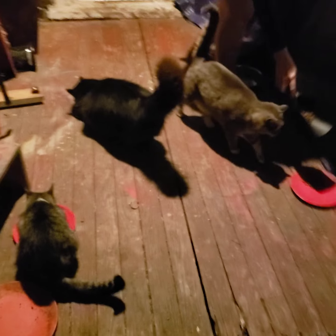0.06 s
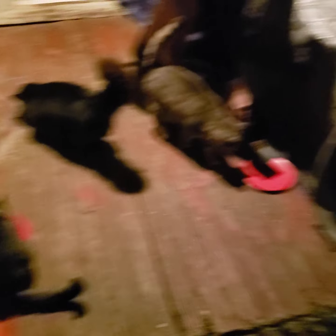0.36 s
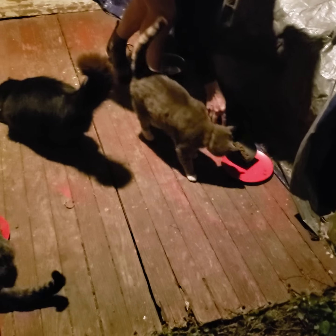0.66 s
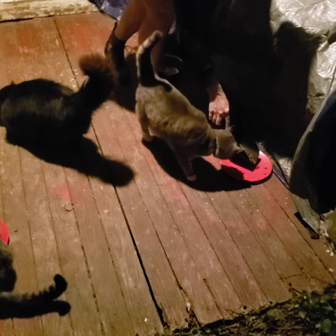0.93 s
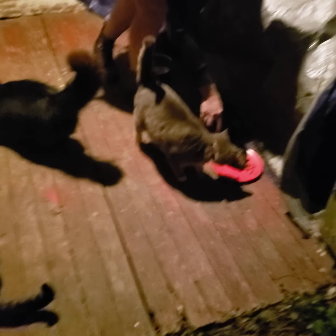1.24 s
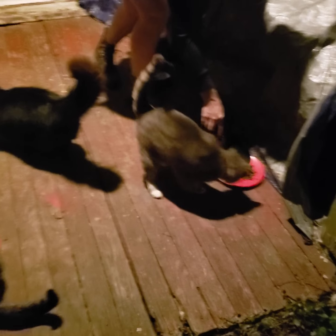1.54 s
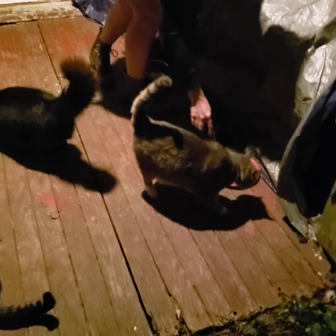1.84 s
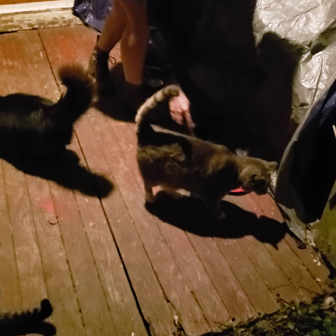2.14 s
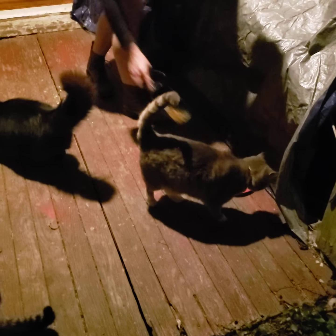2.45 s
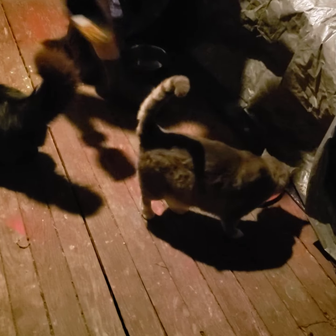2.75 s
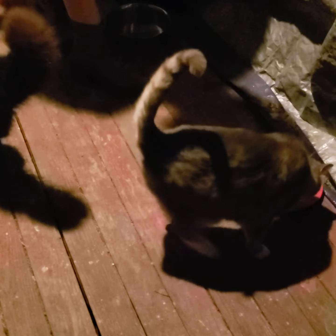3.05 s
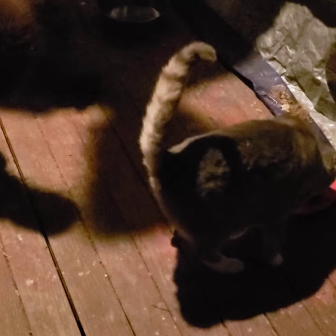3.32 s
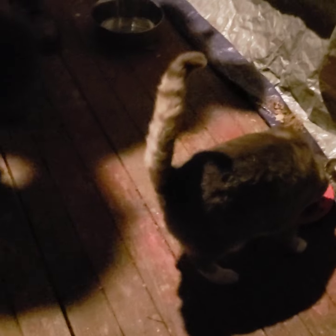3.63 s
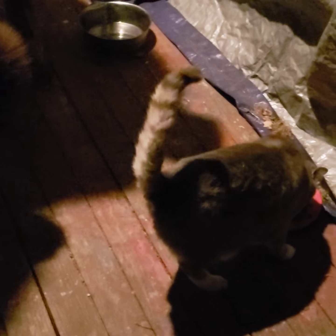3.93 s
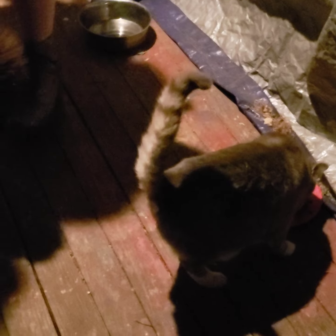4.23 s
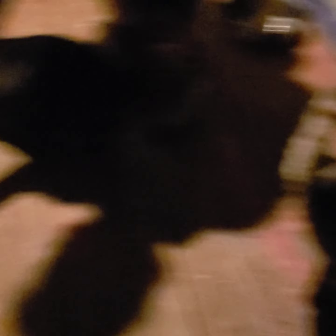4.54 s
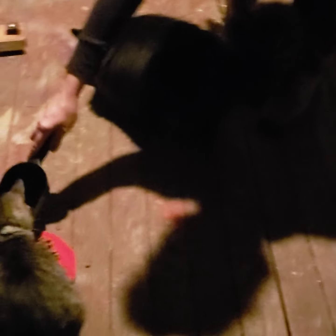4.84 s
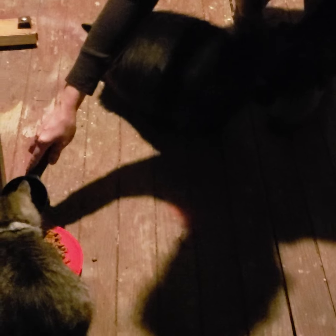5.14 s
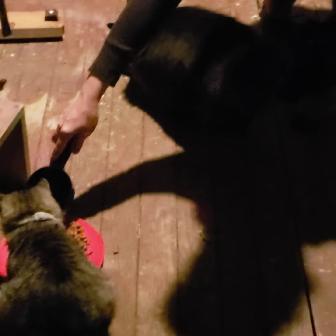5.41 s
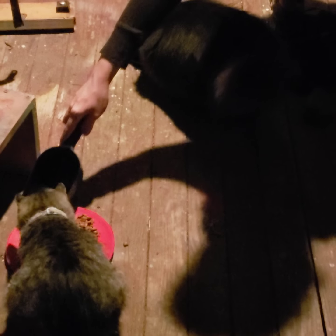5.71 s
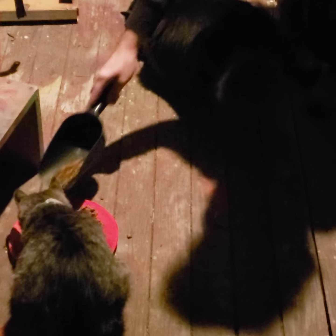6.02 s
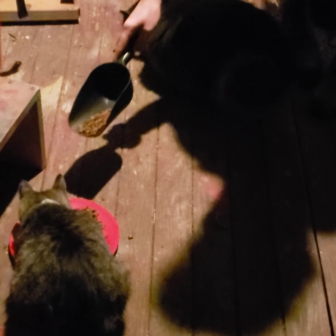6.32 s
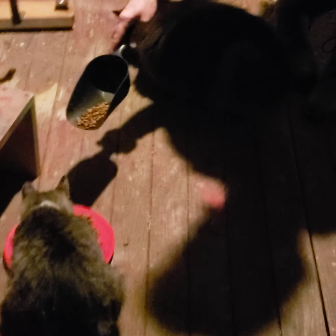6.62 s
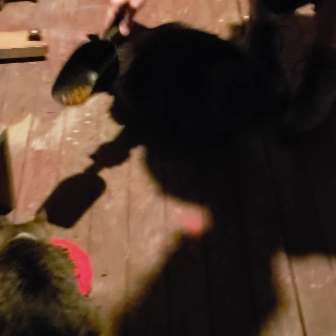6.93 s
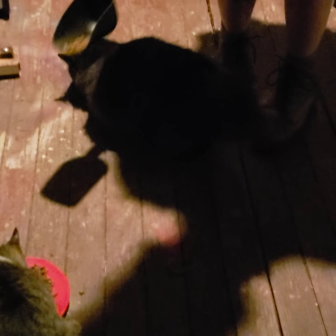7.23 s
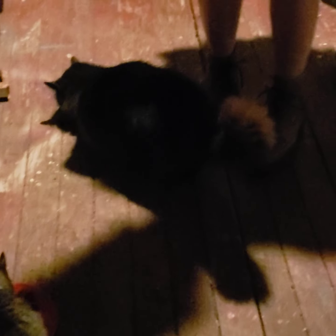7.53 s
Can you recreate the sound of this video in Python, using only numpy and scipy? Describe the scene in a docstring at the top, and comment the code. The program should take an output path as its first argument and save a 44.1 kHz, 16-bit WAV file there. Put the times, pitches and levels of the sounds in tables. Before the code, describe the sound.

On a wooden porch at night, dry cat food ticks and slides from a scoop onto a plastic plate close to the microphone. Down the street a deep, throaty engine revs up, shifts gear, pulls again and coasts away burbling. A second, denser rattle of pellets lands on another plate. Clothes rustle softly and feet scuff the boards over a low, distant town rumble.

```python
"""Dry cat food ticks and slides onto one plastic plate, then another, on a wooden porch at night.
Each pellet contact rings the plate; boards and wall return a short wash. Down the street an
eight-cylinder engine pulls through two gears and coasts: firings boom in the pipe, gas barks, tyres roar.
Clothes rustle close by, with soft scuffs and one squeak, over distant town noise and a faint high ring."""
import sys
import numpy as np
from scipy import signal
from scipy.fft import rfft, irfft
from scipy.io import wavfile
from scipy.ndimage import uniform_filter1d

SR = 44100
rng = np.random.default_rng(int(sys.argv[2]) if len(sys.argv) > 2 else 0)


def int16_out(signal):
    """Quantize to a 16-bit WAV file."""
    q = np.round(np.clip(np.atleast_2d(signal).T, -1, 1) * 32767)
    wavfile.write(sys.argv[1], SR, q.astype(np.int16))


N = 338247
TIME = np.arange(N) / SR

# loudest single pellets: start_s, relative_db, pitch_hz, snap_db
PELLETS = [(0.628, -30, 2960, 2), (0.66, -27.5, 3730, 9), (0.7116, -36, 4840, 0), (0.763, -30, 5670, 5.5),
           (0.9853, -32, 5030, 3), (0.996, -34, 5030, 9), (1.04, -38, 5200, 9), (1.0659, -30.5, 3450, 11),
           (1.0788, -32.5, 5160, 8), (1.1005, -50, 5000, 8), (1.122, -48, 4200, 7), (1.1726, -34, 4970, 2),
           (1.1974, -26, 2640, 3), (1.2172, -30, 2140, 14), (1.2267, -38, 2800, 4),
           (1.2353, -28.5, 5000, 10), (1.2925, -47, 4100, 19), (1.3128, -41, 6760, 11),
           (1.346, -37, 4960, 9), (1.3715, -35.5, 2870, 9), (1.4004, -39, 4360, 11), (1.4578, -40, 4330, 6),
           (1.477, -37, 3300, 3), (1.4964, -40, 4770, 0), (1.6174, -34, 2680, -9.5),
           (1.6454, -39, 4330, -8), (1.664, -32.5, 2970, -6), (1.7476, -37, 5070, 0),
           (1.9552, -38, 2000, -13), (2.039, -40.5, 2440, -12), (4.9705, -39, 2820, 9),
           (5.055, -43, 4200, 9), (5.3066, -36.5, 4050, 0), (5.328, -36.5, 4200, 11),
           (5.3937, -55, 2010, -2), (5.431, -41, 4170, -5), (5.458, -30.5, 4840, 0),
           (5.5768, -52, 4200, -6), (5.5938, -41, 2870, -6), (5.6148, -40, 4240, -4),
           (5.6327, -41, 4150, -2), (5.711, -45, 4240, -8), (5.7407, -35, 4950, -4),
           (5.7637, -32.5, 4900, 4), (5.8083, -51, 2600, -5), (5.8215, -32.5, 5640, 5),
           (5.8472, -38, 3370, 8), (5.8722, -36, 3330, 4)]
# pellets sliding from the scoop: start_s, relative_db, settle_s
SURGES = [(0.659, -52, 0.051), (0.984, -52.5, 0.12), (1.06, -52, 0.11), (1.214, -47, 0.056),
          (1.35, -55.5, 0.4), (1.6, -57, 0.21), (2.134, -65, 0.038), (4.965, -53, 0.026), (5.05, -60, 0.1),
          (5.312, -49, .1), (5.335, -56.5, 0.13), (5.452, -52.5, 0.085), (5.575, -60, .15),
          (5.615, -53, .08), (5.705, -57.5, 0.074), (5.76, -55, 0.055), (5.82, -56.5, 0.059),
          (6.135, -69, 0.08), (6.309, -66, 0.091)]
# dry pellet contact: freq_hz, gain_db
CONTACT_SPECTRUM = [(300, -11.5), (1500, -6.5), (1950, 0.5), (2300, 1.5), (2700, 3), (3400, 2), (5200, 1.5),
                    (6600, -9), (7200, -23), (8700, -26), (11000, -21), (15500, -28)]
# plastic plate modes: pitch_hz, width_hz, gain_db
FIRST_PLATE_MODES = [(1897, 91, 5.5), (2800, 157, 2.5), (3400, 190, -3), (4240, 130, -3), (4980, 290, 1),
                     (5670, 110, 0.5), (6300, 150, 2.5), (7880, 160, 7.5), (9630, 200, 8), (10940, 220, 3),
                     (13200, 250, 1.5), (14400, 140, 11.5)]
SECOND_PLATE_MODES = [(2010, 96, 1.5), (2600, 110, 2.1), (3355, 110, 1.3), (4150, 260, 4.8),
                      (4920, 120, 5.9), (5670, 130, 3.8), (6560, 170, 2), (7340, 150, 6), (11770, 360, 4.3),
                      (12800, 600, 4.5), (14500, 400, 4.1)]
SECOND_PLATE_S, SURGE_ATTACK_S = 4, 0.008
SNAP_HZ, SURGE_SNAP_DB = 7540, 9

# four-stroke engine speed: time_s, cycle_hz
ENGINE_SPEED = [(0.0, 12.04), (0.35, 12.64), (0.8, 14.74), (1.25, 16.96), (1.6, 18.88), (1.9, 20.67),
                (2.0, 20.28), (2.26, 18.0), (2.45, 15.59), (2.6, 15.18), (2.95, 15.78), (3.5, 17.67),
                (4.02, 19.76), (4.46, 21.01), (5.19, 19.8), (5.9, 18.7), (6.34, 18.3), (6.79, 18.4),
                (7.2, 17.1), (7.67, 15.7)]
# throttle pulls, gains at full effort: start_s, build_s, lift_s, boom_db, overtones_db
PULLS = [(0.602, 4, 1.83, 8.5, 15), (2.322, 1.9, 4.51, 6.5, 13.5), (6.103, 0.99, 6.8, 6, 0.5)]
# engine voices by name: nearest_coasting_db, loss_per_doubling_db, effort_exponent, release_s
VOICES = {"boom": (-35, 3.5, 0.35, 0.5), "overtones": (-52, 2.5, 0.5, 0.51)}
# lumpy firing pattern, in multiples of the cycle rate: order, gain_db
FIRING_LINES = [(3, -10), (4, -5.5), (5, 1.5), (6, -8), (7, -3), (8, -19), (9, -5), (10, -8), (11, -4),
                (12, -4), (13, -13), (14, -1.5), (15, -8), (16, 0), (17, -7)]
# brief swells of single lines: order, middle_s, half_length_s, gain_db
LINE_SWELLS = [(7, 0.22, 0.14, 9.5), (7, 1.74, 0.3, 9.5), (4, 1.65, 0.63, 6), (7, 3.55, 0.11, 8),
               (4, 4.05, 0.12, 8.5), (5, 6.56, 0.41, 6)]
# brief swells and dips of the boom: middle_s, half_length_s, gain_db
BOOM_WAVERS = [(0.658, .1, -1.5), (1.226, 0.027, 3), (1.817, 0.11, 3.5), (2.122, 0.21, -5.5),
               (3.08, 0.079, -3.5), (3.847, 0.064, 4), (4.075, 0.046, 2.5), (4.263, 0.064, -2),
               (4.447, 0.063, 4.5), (4.64, 0.089, -4), (5.99, 0.023, -4.5), (6.707, 0.091, 5),
               (7.201, 0.13, -9)]
# exhaust pipe responses: freq_hz, gain_db
BOOM_SPECTRUM = [(20, -62), (40, -14.5), (55, -1), (75, 5), (92, 6), (110, 5), (142, -3), (165, -18),
                 (230, -65), (3000, -110)]
OVERTONE_SPECTRUM = [(110, -50), (145, -15), (165, 11.5), (183, 4.5), (198, 8), (215, 1), (238, 6.5),
                     (256, 4.5), (278, -11), (350, -20.5), (600, -55.5), (3000, -100)]
# exhaust gas rasp: freq_hz, gain_db
LOW_RASP_SPECTRUM = [(350, -11), (560, -11.5), (670, -3), (790, 3.5), (900, -3), (1060, -5.5), (1250, -18),
                     (1600, -12.5), (2500, -57)]
HIGH_RASP_SPECTRUM = [(700, -14), (1200, -8), (1550, -2), (1850, 7.5), (2300, -3.5), (3000, -12),
                      (6000, -48)]
# rasp envelope: time_s, low_db, ring_and_high_db
RASP_LEVELS = [(0, -63, -70.5), (1, -55.5, -68.5), (1.4, -56.5, -64), (1.619, -51, -53), (1.85, -49, -51),
               (2.0, -54.5, -61), (2.29, -61.5, -61), (2.351, -52, -58), (2.65, -56, -60.5),
               (2.87, -62.5, -64.5), (3.349, -59.5, -66), (3.849, -54, -65), (4.151, -51.5, -59.5),
               (4.5, -52.5, -65), (4.719, -59.5, -67.5), (6.101, -64.5, -78.5), (6.6, -61, -79.5),
               (7.3, -78.5, -82.5)]
# tyres on the road: freq_hz, gain_db
TYRE_SPECTRUM = [(150, -15.5), (300, 3.5), (400, -4.5), (520, 1), (640, -3.5), (790, -4.5), (1000, -13),
                 (1250, -13), (2500, -58)]
NEAREST_S, NEAREST_M, SPEED_M_S = 2.7, 26, 10.1
THROTTLE_OPEN_S, THROTTLE_SHUT_S = 0.21, 0.089
BURBLE_PULLING, BURBLE_COASTING = 0.035, 0.75  # share of uneven burning
EVEN_BELOW_HZ, BURBLING_ABOVE_HZ = 14, 16
BARK_LEAD_CYCLES, WEAK_BARK_DB, BARK_SCATTER_DB = .13, -2.5, 1.6
PUFF_RISE_S, PUFF_DECAY_S, PUFF_FLOOR = .007, .01, .24
KNOCK_DB, HISS_DB = -4, -12  # relative to puff, to ring
RING_HZ, RING_REF_CYCLE_HZ, RING_EXPONENT, RING_WIDTH_HZ = 1336, 24.7, 0.15, 196

# moving clothes: middle_s, half_length_s, level_db, scrape_share
SWISHES = [(.02, 0.55, -68, 0.15), (0.495, 0.2, -60, 0.05), (0.874, 0.15, -61.5, 0),
           (1.55, 0.52, -57, 0.08), (2.975, 0.038, -66, 0.2), (3.154, 0.41, -66, 0.3),
           (3.548, 0.19, -60, 0.7), (3.827, 0.27, -65.5, 0.6), (4.522, 0.39, -61.5, 0.3),
           (7.122, .22, -69, 0.9), (7.404, 0.16, -65.5, 0.83)]
# soft and scraping fabric: freq_hz, gain_db
CLOTH_SPECTRUM = [(900, -1), (1900, 8), (3200, 1), (4300, 2.5), (5200, -3.5), (6200, -15), (7500, -26.5),
                  (12000, -33)]
SCRAPE_SPECTRUM = [(1500, -23.5), (2300, -10), (2680, 6), (2900, 1.5), (3400, 2.5), (3700, -1.5),
                   (4020, 0.5), (4300, -7), (5100, -12), (7000, -31.5), (12000, -39)]
# feet and scoop on the porch: start_s, level_db, centre_hz, decay_s
SCUFFS = [(2.171, -47, 1440, 0.029), (2.95, -52.5, 1445, 0.066), (3.55, -53.5, 1480, 0.24),
          (3.70, -55.5, 1900, 0.038), (6.31, -58, 900, 0.13)]
# night air and hiss: freq_hz, gain_db
AIR_SPECTRUM = [(25, 5.5), (60, 9.5), (200, 5.5), (400, 3), (800, -12.5), (1300, -31), (2200, -33),
                (4000, -52), (6000, -55), (8200, -52.5), (11500, -37), (15500, -35)]


def kibble():
    """Sparse pour on the first plate, dense rattle on the second, with single pellets standing out."""
    hits = np.zeros((2, N))
    for start_s, db, pitch_hz, snap_db in PELLETS:
        add(hits, start_s, undb(db - 13.5) * snap(tick(pitch_hz), snap_db))
    hits *= pan(3.9)
    sparse = stream(rate_hz=330, spread_db=2.5)
    dense = stream(rate_hz=1000, spread_db=1.5)
    second = TIME > SECOND_PLATE_S
    pours = (sparse, FIRST_PLATE_MODES, ~second), (dense, SECOND_PLATE_MODES, second)
    out = 0
    for grains, modes, pouring in pours:
        contacts = (hits + grains * undb(2.5) * pan(4.1)) * pouring
        out += plate(contacts, modes)
    return out * undb(-1.53)


def tick(pitch_hz, decay_s=.0018, grit=3.2):
    """One contact: the pellet's short ring plus the crunch of its rough crust."""
    t = np.arange(512) / SR
    crunch = (rng.standard_normal(len(t)) + rng.standard_normal((2, len(t)))) / np.sqrt(2)
    return (np.sin(2 * np.pi * pitch_hz * t) + grit * crunch) * np.exp(-t / decay_s)


def snap(contacts, db):
    """Treble shelf: harder contacts are brighter."""
    return colour(contacts, [(SNAP_HZ * 0.7, 0), (SNAP_HZ, db)], size=512)


def stream(rate_hz, spread_db):
    """Many small, unequal contacts; louder and brighter with stronger flow."""
    timing, size = rng.random((N, 2)).T
    contacts = (timing < rate_hz / SR) * undb(-spread_db * np.log(np.maximum(size, .02)))
    t = np.arange(256) / SR
    crunch = signal.oaconvolve(contacts, np.exp(-t / 0.0027))[:N]
    strength = flow()
    dull = steady(crunch, 0.027) * stereo_noise(0.12, 0) * strength
    hardness = (strength / strength.max()) ** 2
    return dull + hardness * (snap(dull, SURGE_SNAP_DB) - dull)


def flow():
    """Stream strength: each surge starts fast and dies as the pellets settle."""
    power, t = np.zeros(N), np.arange(SR) / SR
    for start_s, db, settle_s in SURGES:
        shape = np.minimum(t / SURGE_ATTACK_S, np.exp((SURGE_ATTACK_S - t) / settle_s))
        add(power, start_s, (undb(db) * shape) ** 2)
    return np.sqrt(power)


def plate(contacts, modes, ring_db=0.5, porch_db=-3.5, porch_t60_s=0.16):
    """Contacts ring the plate; boards and wall return a short wash."""
    t = np.arange(SR // 3) / SR
    ring = 0
    for pitch_hz, width_hz, db in modes:
        phase = 2 * np.pi * rng.random((2, 1))
        envelope = undb(db) * width_hz * np.exp(-np.pi * width_hz * t)
        ring += envelope * np.sin(2 * np.pi * pitch_hz * t + phase)
    wash = rng.standard_normal((2, len(t))) * undb(-60 * t / porch_t60_s) * (1 - np.exp(-t / 0.0027))
    body = (undb(ring_db) * unit(ring) + undb(porch_db) * unit(wash)) / np.sqrt(len(t))
    body[:, 0] += 1  # direct sound
    return signal.oaconvolve(contacts, colour(body, CONTACT_SPECTRUM), axes=1)[:, :N]


def exhaust(cycle_hz, cycles):
    """Even firing gives gliding lines; off throttle, uneven firing burbles in the same pipe."""
    overrun = (1 - throttle()) * np.interp(cycle_hz, [EVEN_BELOW_HZ, BURBLING_ABOVE_HZ], [.15, 1])
    burble = np.clip(BURBLE_PULLING + (BURBLE_COASTING - BURBLE_PULLING) * overrun, 0, 1)
    boom_db = voice_db("boom") + sum(db * swell(s, half_s) for s, half_s, db in BOOM_WAVERS)
    boom, overtones = even_firing(cycle_hz, cycles)
    thumps = uneven_firing(cycles)
    # only a hard pull lifts clear overtones out of the burble
    blur = np.clip(undb(-pull_db("overtones")) ** 2, burble, 1)
    out = 0
    for lines, pipe, db, rough_share in ((boom, BOOM_SPECTRUM, boom_db, burble),
                                         (overtones, OVERTONE_SPECTRUM, voice_db("overtones"), blur)):
        even = np.sqrt(1 - rough_share) * steady(lines, 0.36)
        rough = np.sqrt(rough_share) * steady(colour(thumps, pipe), 1.0)
        out += undb(db) * steady(even + rough, 0.15)
    street_scatter = undb(boom_db - 16.5) * unit(colour(rng.standard_normal((2, N)), BOOM_SPECTRUM))
    return out * pan(-0.81) + street_scatter


def even_firing(cycle_hz, cycles):
    """Harmonics of the cycle rate through the pipe's two responses."""
    boom, overtones = np.zeros((2, N))
    shaft_cycles = cycles + 0.003 * wander(14)
    for order, db in FIRING_LINES:
        swell_db = sum(peak_db * swell(s, half_s) for k, s, half_s, peak_db in LINE_SWELLS if k == order)
        gain = undb(db + swell_db + 2 * wander(6.5))
        line = gain * np.sin(2 * np.pi * (order * shaft_cycles + rng.random()))
        boom += line * response(BOOM_SPECTRUM, order * cycle_hz)
        overtones += line * response(OVERTONE_SPECTRUM, order * cycle_hz)
    return boom, overtones


def uneven_firing(cycles, cylinders=8, jitter_s=.0012):
    """One impulse per firing, scattered in time and strength."""
    firings = np.flatnonzero(np.diff(np.floor(cylinders * cycles)))
    jitter, strength = rng.standard_normal((2048, 2))[:len(firings)].T
    firings += (jitter_s * SR * jitter).astype(int)
    thumps = np.zeros(N)
    thumps[np.clip(firings, 0, N - 1)] = strength
    return thumps


def rasp(cycle_hz, cycles):
    """Gas barks twice a cycle, strong then weak; each bark rings the tailpipe and trails a noise puff."""
    barks = 2 * (cycles + BARK_LEAD_CYCLES)
    index = barks.astype(int)
    age_s = (barks % 1) / (2 * cycle_hz)
    strength = undb(BARK_SCATTER_DB * rng.standard_normal(1024)[index] + WEAK_BARK_DB * (index % 2))
    puffs = strength * np.exp(-age_s / PUFF_DECAY_S) * (0.041 + throttle())
    puffs = steady(PUFF_FLOOR + uniform_filter1d(puffs, int(PUFF_RISE_S * SR)), 0.21)
    knocks = undb(KNOCK_DB) * unit(strength * np.diff(index, prepend=0)) * pan(-3)
    low = unit(colour(stereo_noise(0.3, -2.0) * puffs, LOW_RASP_SPECTRUM))
    doppler = 1 - np.gradient(distance_m()) * SR / 343
    ring_hz = RING_HZ * (cycle_hz / RING_REF_CYCLE_HZ) ** RING_EXPONENT * doppler
    ring = unit(resonance(knocks + stereo_noise(0.4, -4) * puffs, ring_hz, RING_WIDTH_HZ))
    hiss = undb(HISS_DB) * unit(colour(stereo_noise(0.2, -6.5) * puffs, HIGH_RASP_SPECTRUM))
    s, low_db, high_db = np.transpose(RASP_LEVELS)
    return low * undb(np.interp(TIME, s, low_db)) + (ring + hiss) * undb(np.interp(TIME, s, high_db))


def throttle():
    """Opening: 0 coasting, 1 pulling."""
    return sum(ramp(start_s, THROTTLE_OPEN_S) * (1 - ramp(lift_s, THROTTLE_SHUT_S))
               for start_s, _, lift_s, *_ in PULLS)


def voice_db(voice):
    """Engine voice level: up with effort, down with distance."""
    coasting_db, loss_db, *_ = VOICES[voice]
    return coasting_db - loss_db * np.log2(distance_m() / NEAREST_M) + pull_db(voice)


def pull_db(voice):
    """Gain from effort: builds in each pull, falls after lift-off."""
    _, _, exponent, release_s = VOICES[voice]
    db = 0
    for start_s, build_s, lift_s, boom_db, overtones_db in PULLS:
        effort = ramp(start_s, build_s) ** exponent * (1 - ramp(lift_s, release_s))
        db += effort * (boom_db if voice == "boom" else overtones_db)
    return db


def distance_m():
    """Vehicle to listener, along a straight street."""
    return np.hypot(NEAREST_M, SPEED_M_S * (TIME - NEAREST_S))


def tyres(nearest_db=-53.5, loss_per_doubling_db=6):
    """Even road roar, fading with distance."""
    db = nearest_db - loss_per_doubling_db * np.log2(distance_m() / NEAREST_M)
    return unit(colour(stereo_noise(0.46, -4.5), TYRE_SPECTRUM)) * undb(db)


def clothes(rest_db=-77.5):
    """Fabric slides over fabric in soft swishes; some scrape."""
    soft_power, scrape_power = undb(rest_db) ** 2, 0
    for middle_s, half_s, db, scrape_share in SWISHES:
        power = (undb(db) * swell(middle_s, half_s)) ** 2
        soft_power += (1 - scrape_share) * power
        scrape_power += scrape_share * power
    soft = unit(colour(stereo_noise(0.22, 8.2), CLOTH_SPECTRUM)) * np.sqrt(soft_power)
    scrape = unit(colour(stereo_noise(0.22, 8.2), SCRAPE_SPECTRUM)) * np.sqrt(scrape_power)
    return (soft + scrape) * undb(1.3 * wander(70))


def scuffs():
    """Feet and scoop on the boards: dull, short noise bursts."""
    out, t = np.zeros((2, N)), np.arange(SR // 2) / SR
    for start_s, db, hz, decay_s in SCUFFS:
        spectrum = [(hz / 4, -14), (hz / 2.1, -2), (hz, 0), (hz * 2, -14), (hz * 4, -36), (hz * 6, -55)]
        scuff = unit(colour(rng.standard_normal((2, len(t))), spectrum))
        add(out, start_s, undb(db) * scuff * np.exp(-t / decay_s))
    return out


def squeak(pitch_hz=3050, width_hz=300, level_db=-74):
    """A short, gritty rub in one resonance."""
    rub = stereo_noise(0.3, 3) * undb(3 * wander(120))
    return unit(resonance(rub, pitch_hz, width_hz)) * undb(level_db) * swell(middle_s=2.64, half_s=0.071)


def night_ring(pitch_hz=4100, width_hz=150, level_db=-90):
    """Thin, steady high band, perhaps far insects."""
    return unit(resonance(stereo_noise(0.24, 1.5), pitch_hz, width_hz)) * undb(level_db)


def air(level_db=-53):
    """Distant town rumble under a faint hiss."""
    return unit(colour(stereo_noise(0.9, -0.59), AIR_SPECTRUM)) * undb(level_db + 0.64 * wander(6))


def undb(db):
    """Decibels to gain."""
    return 10 ** (np.asarray(db) / 20)


def unit(x):
    """Scale to rms 1."""
    return x / np.sqrt(np.mean(x ** 2))


def steady(x, window_s):
    """Hold running rms at 1; quick flutter stays."""
    power = uniform_filter1d(x ** 2, int(window_s * SR))
    return x / np.sqrt(np.maximum(power, 0) + 1e-12)


def response(spectrum, hz):
    """Gain of a spectrum at hz."""
    freq_hz, db = np.transpose(spectrum)
    return undb(np.interp(np.log(np.maximum(hz, 1)), np.log(freq_hz), db))


def colour(x, spectrum, size=8192):
    """Minimum-phase filter, built from the cepstrum."""
    cepstrum = irfft(np.log(response(spectrum, np.arange(size // 2 + 1) * SR / size)))
    cepstrum[1:size // 2] *= 2
    cepstrum[size // 2 + 1:] = 0
    taps = irfft(np.exp(rfft(cepstrum)))
    return signal.oaconvolve(x, taps if x.ndim == 1 else taps[None], axes=-1)[..., :x.shape[-1]]


def resonance(x, centre_hz, width_hz):
    """Narrow band-pass; the centre may glide."""
    carrier = np.exp(2j * np.pi * np.cumsum(np.broadcast_to(centre_hz, N)) / SR)
    lowpass = signal.butter(2, width_hz / 2, fs=SR, output="sos")
    return np.real(signal.sosfilt(lowpass, x / carrier) * carrier)


def ramp(start_s, length_s):
    """Linear 0 to 1, then hold."""
    return np.clip((TIME - start_s) / length_s, 0, 1)


def swell(middle_s, half_s):
    """Bell in time, peak 1."""
    return np.exp(-np.minimum(((TIME - middle_s) / half_s) ** 2, 20))


def wander(rate_hz):
    """Random drift, spread near 1."""
    knots = rng.standard_normal(2048)
    return np.interp(TIME * rate_hz, np.arange(len(knots)), knots) * np.sqrt(3 / 2)


def stereo_noise(correlation, left_db):
    """Panned white noise, partly alike in both channels."""
    shared = np.sqrt(correlation) * rng.standard_normal(N)
    separate = np.sqrt(1 - correlation) * rng.standard_normal((2, N))
    return (shared + separate) * pan(left_db)


def pan(left_db):
    """Channel gains for a left-minus-right level."""
    return undb(np.array([[left_db], [-left_db]]) / 2)


def add(track, start_s, sound):
    """Mix a sound into a track in place."""
    start = max(int(start_s * SR), 0)
    span = track[..., start:start + sound.shape[-1]]
    span += sound[..., :span.shape[-1]]


def scene():
    """Vehicle down the street, food and clothes close by, night behind."""
    cycle_hz = np.interp(TIME, *np.transpose(ENGINE_SPEED))
    cycles = np.cumsum(cycle_hz) / SR
    vehicle = exhaust(cycle_hz, cycles) + rasp(cycle_hz, cycles) + tyres()
    return vehicle + kibble() + scuffs() + clothes() + squeak() + night_ring() + air()


def record(dry):
    """Steep low-pass on the top treble."""
    cutoff_hz = 15800
    return signal.sosfilt(signal.ellip(10, .2, 80, cutoff_hz, fs=SR, output="sos"), dry)


dry = scene()
out = record(dry)
int16_out(out)
```